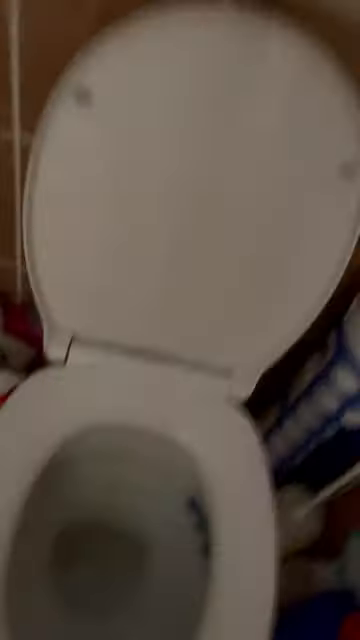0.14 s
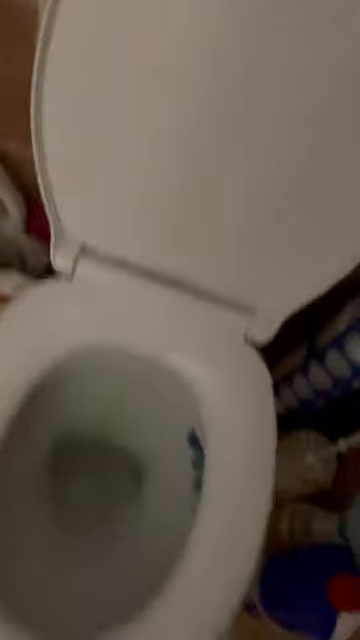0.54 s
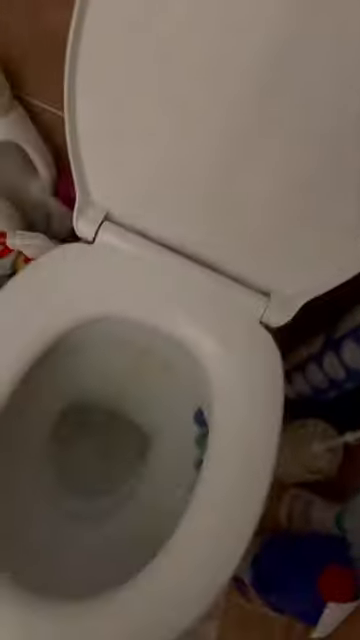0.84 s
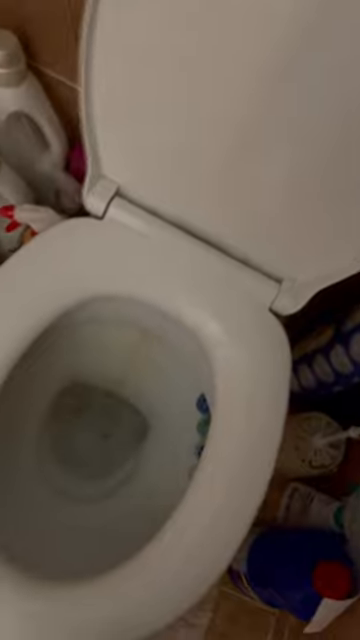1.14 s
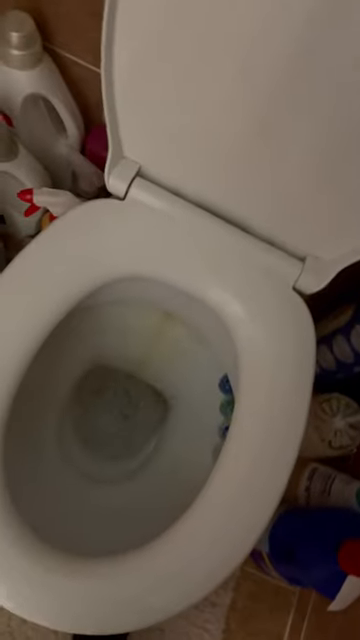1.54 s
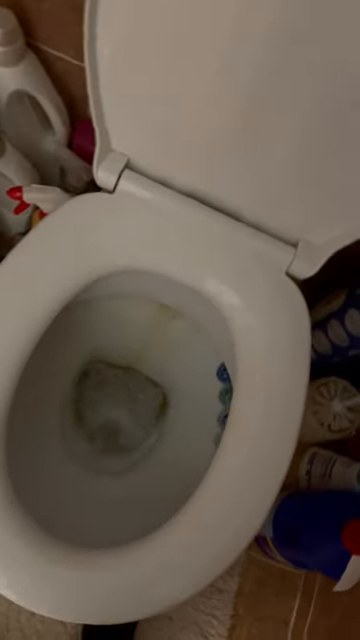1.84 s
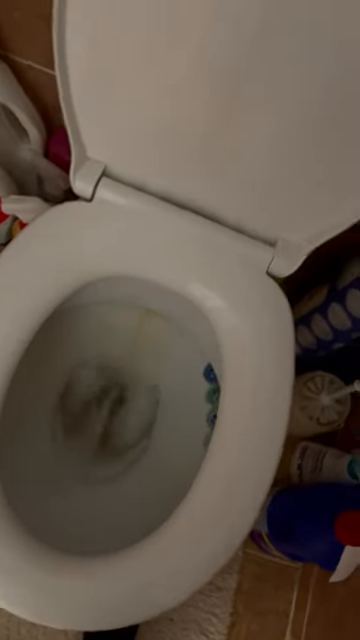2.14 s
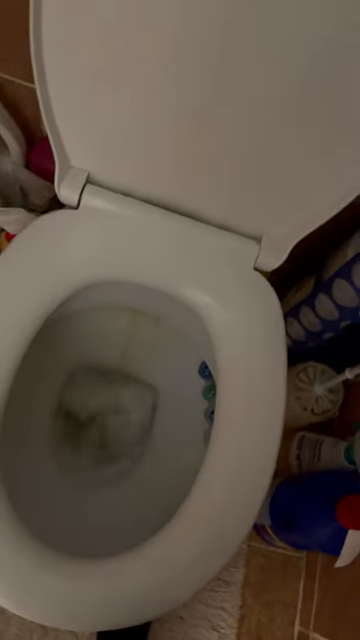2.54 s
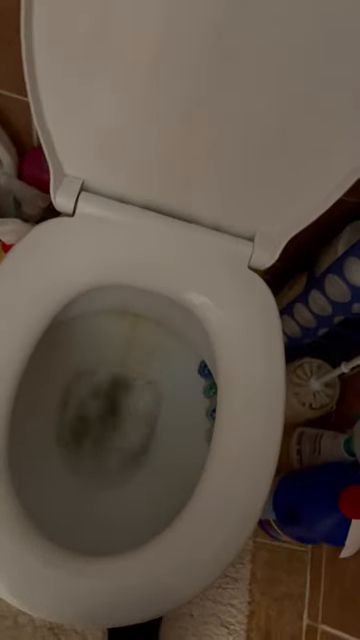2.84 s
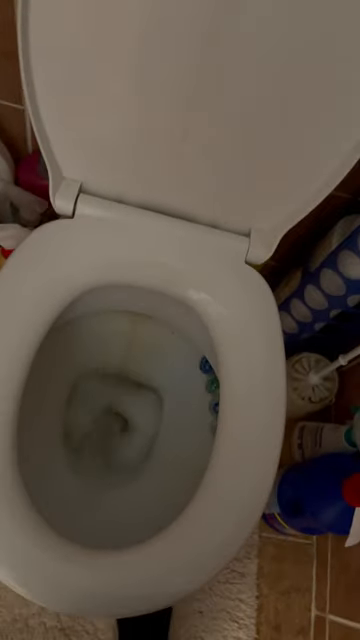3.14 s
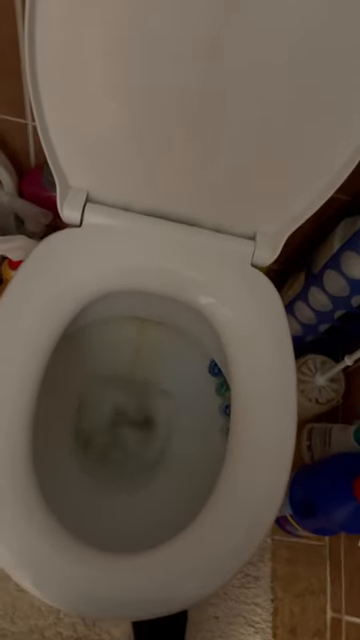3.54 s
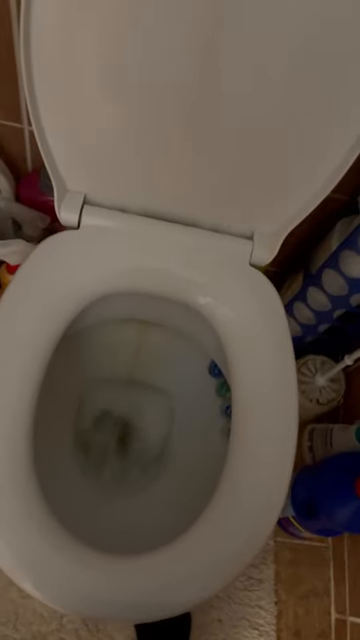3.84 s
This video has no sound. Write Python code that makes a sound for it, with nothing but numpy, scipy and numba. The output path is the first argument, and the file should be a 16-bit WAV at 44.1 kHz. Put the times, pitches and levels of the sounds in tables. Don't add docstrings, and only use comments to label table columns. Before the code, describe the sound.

Toilet flush in a small tiled bathroom, metallic rattling and a clunk before splashing, gurgling water

```python
import sys
import numpy as np
from scipy import signal
from scipy.fft import rfft, irfft
from scipy.io import wavfile
from scipy.ndimage import uniform_filter1d
from numba import njit

SR = 44100
rng = np.random.default_rng(int(sys.argv[2]) if len(sys.argv) > 2 else 0)


def unload_wav(signal):
    wavfile.write(
        sys.argv[1],
        SR,
        np.round(np.clip(np.atleast_2d(signal).T, -1, 1) * 32767).astype(np.int16),
    )


def boost(x):
    u = np.asarray(x, float) / 20
    return 10 ** u


N = 176400
T = np.arange(N) / SR
HZ = np.maximum(np.fft.rfftfreq(N + SR, 1 / SR), 1)

# time in seconds, flow in the bowl in dB, spray at the rim in dB.
FLOW_COURSE = [(.61, -91, -90), (.63, -72, -48.5), (.75, -71, -45.5), (1.05, -61, -53),
               (1.41, -48.5, -40.5), (1.47, -41, -40), (1.75, -34.5, -43), (1.8, -36.5, -39),
               (2.3, -33.5, -37.5), (2.8, -35.5, -38.5), (3.1, -34.5, -41), (3.2, -34.5, -40),
               (4., -34.5, -40)]
# start in seconds, peak in dB, pitch in Hz.
GULP_EVENTS = [(1.407, -25.5, 1360), (1.455, -35, 844), (1.47, -26.5, 1370), (1.647, -21.5, 885),
               (1.789, -20.5, 1360), (1.829, -14, 837), (1.922, -26, 735), (1.967, -32, 980),
               (2.002, -43, 918), (2.047, -34, 926), (2.063, -18.5, 868), (2.075, -13, 923),
               (2.214, -57, 920), (2.236, -39, 1050), (2.25, -23, 864), (2.367, -38, 875),
               (2.639, -37, 880), (2.688, -43, 860), (2.793, -36, 695), (2.834, -21.5, 1200),
               (2.867, -25, 937), (2.895, -23, 646), (2.925, -22.5, 1010), (2.987, -23, 1004),
               (3.008, -21, 980), (3.045, -16, 930), (3.075, -20.5, 970), (3.136, -40, 1150),
               (3.229, -39, 910), (3.271, -30, 910), (3.338, -31, 870), (3.447, -17.5, 950),
               (3.484, -35, 1070), (3.663, -20.5, 760), (3.795, -22.5, 1020), (3.857, -22, 960)]
# start in seconds, peak in dB, pitch in Hz.
PLINK_EVENTS = [(1.4563, -24, 1950), (1.5716, -26, 1676), (1.7892, -30, 1620), (1.834, -37, 1550),
                (1.8795, -21, 4190), (1.9048, -22, 3020), (2.0763, -25, 5800), (2.215, -31, 1700),
                (2.2499, -24, 2230), (2.5895, -28, 1800), (2.6086, -24, 2450), (2.6385, -49, 6840),
                (2.6858, -48, 3730), (2.8018, -31, 2390), (2.8949, -30, 1790), (2.9867, -24.5, 2220),
                (3.0366, -23, 2380), (3.068, -18, 2276), (3.6163, -25, 2390), (3.7192, -29, 3000)]
# frequency in Hz, level in dB, 60 dB decay time in seconds.
VALVE_MODES = [(851, -8, 0.22), (877, -4, 0.12), (933, -2.5, 0.047), (1020, 0, 0.074), (1083, -5.5, 0.039),
               (1283, -22.5, 0.26), (1500, -25.5, 0.11)]


def unit(x):
    return x / np.sqrt(np.mean(x ** 2))


def over_hz(table):
    hz, db = np.array(table).T
    return np.interp(np.log(HZ), np.log(hz), db)


def over_t(table, axis):
    rows = np.array(table)
    return boost(np.interp(T, rows[:, 0], rows[:, axis]))


def tint(x, gain):
    return irfft(rfft(x, N + SR) * gain, N + SR)[..., :N]


def peak(hz, width):
    return 1 / (1 + 1j * (HZ ** 2 - hz ** 2) / (HZ * width))


def ring(x, modes):
    response = 0
    for k, (hz, db, t60) in enumerate(modes):
        click_gain = SR * t60 / 13.8
        response = response + (-1) ** k * boost(db) * peak(hz, 2.2 / t60) * click_gain
    return tint(x, response)


def burst(s, db, decay_s, rise_s):
    since = np.maximum(T - s, 0)
    return boost(db) * np.minimum(since / rise_s, 1) * boost(-60 * since / decay_s)


def walk(count):
    k = int(SR / count)
    steps = np.repeat(rng.standard_normal(N // k + 1), k)
    return unit(uniform_filter1d(uniform_filter1d(steps, k), k)[:N])


def patchy(table, slow_db, quick_db):
    out = 0
    swell = walk(count=20)
    spectrum = boost(over_hz(table))
    for hz in 30 * 2 ** np.arange(0, 9.1, .5):
        band = np.exp(-(np.log2(HZ / hz) / .35) ** 2)
        noise = tint(rng.standard_normal(N), band * spectrum)
        out = out + noise * boost(slow_db * swell + quick_db * walk(count=45))
    return unit(out)


@njit
def grains(start, hz, cycles, size, glide, count, sr):
    out = np.zeros(count)
    for j in range(len(start)):
        phase = 0.
        tau = cycles[j] / hz[j] * sr / 5
        for i in range(min(int(9 * tau), count - start[j])):
            phase += 2 * np.pi * hz[j] * (1 + glide * i / (5 * tau)) / sr
            out[start[j] + i] += size[j] * np.sin(phase) * np.exp(1 - i / tau) * i / tau
    return out


def swarm(count, lo_hz, hi_hz, cycles, scatter_db, glide):
    when, pitch, length, luck = rng.random((count, 4)).T
    start = (when * N).astype(np.int64)
    hz = lo_hz * (hi_hz / lo_hz) ** pitch
    size_db = np.minimum(-scatter_db * np.log(1 - luck), 16)
    clump_db = 1.8 * walk(count=30)[start]
    return unit(grains(start, hz, cycles * (.5 + length), boost(size_db + clump_db), glide, N, 1. * SR))


def bowl_churn():
    # frequency in Hz, width in Hz, level in dB.
    cavities = [(78, 11, -1), (106, 75, -0.5), (202, 17, 6), (245.4, 91, 1.5), (303.7, 72, 4),
                (717.5, 155, -12), (892, 141, -7), (1054, 167, -8.5), (1334, 450, -12), (2460, 1170, -14)]
    # frequency in Hz, level in dB.
    roar = [(30, -9), (200, -17), (450, -18), (1000, -10.5), (2000, -15), (4000, -17.5), (8000, -63),
            (14000, -60)]
    bubbles = swarm(count=3000, lo_hz=445.6, hi_hz=3460, cycles=8.2, scatter_db=0.5, glide=0.19)
    stir = bubbles * boost(7.5) + rng.standard_normal(N) * boost(2 * walk(count=40))
    hollow = 0
    for k, (hz, width, db) in enumerate(cavities):
        waver_db = min(hz / 450, 1.3) * walk(count=16)
        hollow = hollow + boost(db + waver_db) * tint(stir, (-1) ** k * peak(hz, width) ** 2)
    churn = unit(hollow) + boost(-7) * patchy(roar, slow_db=-2.5, quick_db=1)
    slosh = sum(burst(s, db - 12, decay_s=.04, rise_s=0.0023) for s, db, _ in GULP_EVENTS)
    return churn * (over_t(FLOW_COURSE, axis=1) + slosh)


def rim_spray(drops):
    # frequency in Hz, level in dB.
    hiss = [(300, -55), (1500, -9.5), (3000, -2.5), (5000, -1), (8000, 0.5), (10500, 4), (12000, -4),
            (15000, -8.5)]
    # start in seconds, level in dB.
    splashes = [(1.14, -44), (1.1983, -35), (1.61, -31), (1.7883, -26.5), (1.863, -22.5), (1.927, -24.5),
                (1.965, -27), (2.008, -32), (2.029, -33), (2.058, -34), (2.0733, -27), (2.098, -27),
                (2.1617, -27), (2.233, -27.5), (2.3231, -37), (2.3506, -36), (2.4784, -24.5),
                (2.642, -27.5), (2.6875, -24), (2.758, -28), (2.8107, -28.5), (2.8944, -32.5), (2.945, -36),
                (3.0105, -30), (3.0685, -29), (3.1625, -33), (3.292, -44), (3.3428, -30), (3.5173, -30.5),
                (3.5982, -32), (3.659, -34), (3.7628, -32), (3.8166, -28), (3.9244, -34)]
    spray = patchy(hiss, slow_db=0.24, quick_db=3.0) + boost(-5) * unit(tint(drops, boost(over_hz(hiss))))
    splash = sum(burst(s, db - 0.5, decay_s=0.021, rise_s=0.0012) for s, db in splashes)
    return spray * (over_t(FLOW_COURSE, axis=2) + splash)


def plink_slaps(drops):
    slap = unit(tint(drops + rng.standard_normal(N), peak(2040, 3300) ** 2))
    return slap * sum(burst(s, db - 6, decay_s=0.026, rise_s=0.00085) for s, db, _ in PLINK_EVENTS)


def gulps_and_plinks():
    # start in seconds, peak in dB, pitch in Hz.
    late_gulps = [
        (1.849, -19, 897),
        (2.092, -17.5, 1093),
        (2.3, -26, 900),
        (3.378, -17.5, 790),
        (3.672, -25, 753),
        (3.9, -24, 850),
    ]
    out = 0
    for rows, extra_db, cycles in ((GULP_EVENTS, -4, 11.), (late_gulps, -6.5, 18.), (PLINK_EVENTS, -4, 22.)):
        s, db, hz = np.array(rows, float).T
        start = (s * SR).astype(np.int64)
        out = out + grains(start, 0.963 * hz, cycles + 0 * s, boost(db + extra_db) * 0.92, 0.15, N, 1. * SR)
    return out


def rim_filling():
    # frequency in Hz, width in Hz, level in dB.
    channel = [(1352, 47, -46), (1470, 110, -57), (281, 56, -47.5)]
    start_s, full_s, faded_s = 1.133, 1.243, 1.74
    fill = np.interp(T, (start_s, full_s, faded_s), (0, 1, 0)) * boost(2 * walk(count=25))
    hum = 0
    for hz, width, db in channel:
        hum = hum + boost(db) * unit(tint(rng.standard_normal(N), peak(hz, width) ** 2))
    return fill * hum


def water():
    drops = swarm(count=9000, lo_hz=1550, hi_hz=12050, cycles=14.0, scatter_db=5.5, glide=0.17)
    return bowl_churn() + rim_spray(drops) + plink_slaps(drops) + gulps_and_plinks() + rim_filling()


def lever():
    # start in seconds, peak in dB, brightness in dB per octave, decay in seconds.
    rattles = [(0.0, -33, 4.5, 0.17), (0.0205, -18.5, 15, 0.034), (0.0424, -24, -0.5, 0.15),
               (0.0944, -16.5, -3, 0.11), (0.2228, -16.5, 10.5, 0.076), (0.2417, -24.5, 4, 0.084),
               (0.253, -19, 6.5, 0.12), (0.335, -43, 1, 0.16), (0.38, -30.5, 4.5, 0.16),
               (0.4563, -37, 4, 0.11), (0.5521, -49, 1, 0.05), (0.5734, -46, 1, 0.069),
               (0.611, -60, -6, .08), (0.624, -26, 6.5, 0.15)]
    # frequency in Hz, level in dB, 60 dB decay time in seconds.
    lever_modes = [(514, 2, .06), (1200, 4, 0.09), (4555, 9, 0.069), (6150, 2, 0.091), (7170, -2, 0.047),
                   (10430, 13, 0.021)]
    out = 0
    roll = 1 / np.sqrt(1 + (HZ / 11500) ** 14) * HZ ** 2 / (HZ ** 2 + 900 ** 2)
    for s, db, tilt_db, decay_s in rattles:
        ticks = rng.standard_normal(N) * boost(3.8 * rng.standard_normal(N))
        clatter = unit(tint(ticks, roll * boost(tilt_db * np.log2(HZ))))
        first_hit = 1 + burst(s, 6, decay_s=0.0043, rise_s=0.00022)
        out = out + clatter * burst(s, db - 5.5, decay_s, rise_s=0.0031) * first_hit
    return out + boost(-8.5) * ring(out, lever_modes) * 0.015


def valve_knocks():
    # start in seconds, cistern level in dB, valve level in dB, lid level in dB.
    knocks = [
        (0.689, -10, -26, -16.5),
        (.703, -21, -11.5, -41),
        (0.711, -20, -22.5, -35),
        (0.731, -12.5, -23.5, -33),
        (0.762, -23, -41, -25),
        (0.792, -29, -46, -26),
        (0.864, -18.5, -38, -18),
        (0.941, -54, -60, -39),
        (1.036, -36.5, -44, -38),
        (1.068, -47, -55, -50),
    ]
    # frequency in Hz, level in dB, 60 dB decay time in seconds.
    cistern_modes = [(78, -19, 0.4), (134.5, -21, 0.33), (239.4, -21, 0.41), (283.4, -13, 0.21),
                     (316.5, -10.5, 0.38), (347, -10.5, 0.24), (441.6, -24, 0.23)]
    # frequency in Hz, level in dB, 60 dB decay time in seconds.
    lid_modes = [(252, -10, 0.63), (274, -22.5, 0.15), (207, -31, 0.28)]
    low, high, lid = np.zeros((3, N))
    for s, low_db, high_db, lid_db in knocks:
        at = int(s * SR)
        low[at], high[at], lid[at] = boost(low_db), boost(high_db), boost(lid_db)
    push = signal.windows.hann(25) / 12
    rumble = sum(burst(s, db, decay_s=0.36, rise_s=0.0022) for s, db, *_ in knocks)
    low = np.convolve(low, push, "same") + 0.011 * rng.standard_normal(N) * rumble
    return ring(low, cistern_modes) + ring(high, VALVE_MODES) + ring(lid, lid_modes)


def valve_scrape():
    # time in seconds, cistern level in dB, valve level in dB.
    scrape = [
        (.565, -106, -90),
        (.58, -45, -66),
        (.648, -34.5, -63),
        (.664, -47, -18.5),
        (.69, -25, -22),
        (.76, -36.5, -39),
        (.9, -43.5, -63),
        (1.0, -46.5, -83),
    ]
    rub = rng.standard_normal((2, N)) * boost(2 * walk(count=60))
    broad = unit(tint(rub[0], peak(320, 410))) * boost(-6.5)
    scale = np.std(ring(rub[1], VALVE_MODES))
    damped = [(hz, db, 0.32 * t60) for hz, db, t60 in VALVE_MODES]
    squeak = ring(rub[1] * over_t(scrape, axis=2), damped) / scale
    return over_t(scrape, axis=1) * broad + 2.55 * squeak


def thuds():
    # start in seconds, level in dB, frequency in Hz, decay in seconds.
    bumps = [
        (0.019, -38, 40.8, 0.83),
        (.095, -49.5, 450, 0.87),
        (.36, -55, 48.9, 0.45),
        (.7, -39, 129, 0.5),
        (2.245, -28, 616, 0.19),
        (2.559, -38.5, 86, 1.07),
        (3.24, -45, 78, 0.62),
        (3.659, -30, 324, 0.13),
    ]
    out = 0
    for s, db, hz, decay_s in bumps:
        dull_noise = unit(tint(rng.standard_normal(N), peak(hz, 0.51 * hz) ** 2))
        out = out + dull_noise * burst(s, db, decay_s, rise_s=0.012)
    return out


def quiet_room():
    # frequency in Hz, level in dB.
    hush = [(20, -40), (45, -16), (100, -12.5), (250, -19.5), (1000, -26), (4000, -31.5), (10000, -24),
            (14000, -63)]
    return boost(-59.5) * patchy(hush, slow_db=-4.0, quick_db=-0.5)


def tiled_room(x):
    t60_s, level_db = 0.22, -8
    tail = rng.standard_normal(N) * boost(-60 * T / t60_s) * (T > .003)
    tail = tail / np.sqrt(np.sum(tail ** 2))
    return tint(x, 1 + boost(level_db) * rfft(tail, N + SR))


def two_ports(near):
    # frequency in Hz, lag in half turns.
    port_lag = [(0, 0), (4350, .36), (4850, 1), (5650, 2), (6250, 2), (8700, 3), (9200, 3), (9900, 3.4),
                (12300, 4)]
    # frequency in Hz, share of sound that differs.
    port_diff = [(60, .04), (300, .2), (850, .42), (1800, .2), (3000, .45), (4850, .28), (7000, .4),
                 (11000, .35)]
    # frequency in Hz, left minus right in dB.
    port_db = [(200, -.5), (380, -2.5), (800, -2), (1300, 0)]
    smear = rng.standard_normal(N) * boost(-60 * T / .2)
    other = rfft(smear / np.sqrt(np.sum(smear ** 2)), N + SR)
    lag = np.pi * np.interp(HZ, *np.array(port_lag).T)
    whole_turns = np.where(HZ > 5200, np.sqrt(np.abs(np.sin(lag)).round(6)), 1)
    share = np.clip(over_hz(port_diff), 0, .9) * whole_turns
    side = boost(over_hz(port_db) / 2)
    ports = []
    for k in (1, -1):
        mixture = np.sqrt(1 - share ** 2) + k * share * other
        ports.append(tint(near, side ** k * np.exp(.5j * k * lag) * mixture))
    return np.array(ports)


def scene():
    sources = water() + lever() + valve_knocks() + valve_scrape() + thuds() + quiet_room()
    return two_ports(tiled_room(sources))


def low_pass(x):
    return signal.sosfilt(signal.butter(12, 15260, fs=SR, output="sos"), x)


def record(dry):
    bass_cut = HZ ** 4 / (HZ ** 4 + 38 ** 4)
    treble_cut = 1 / np.sqrt(1 + (HZ / 11900) ** 13)
    return low_pass(tint(dry, bass_cut * treble_cut))


dry = scene()
out = record(dry)
unload_wav(out)
```